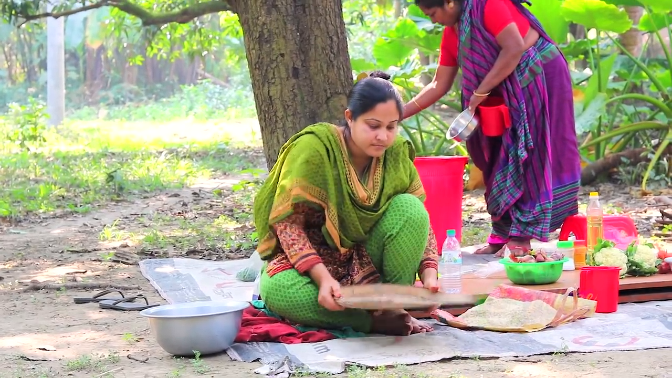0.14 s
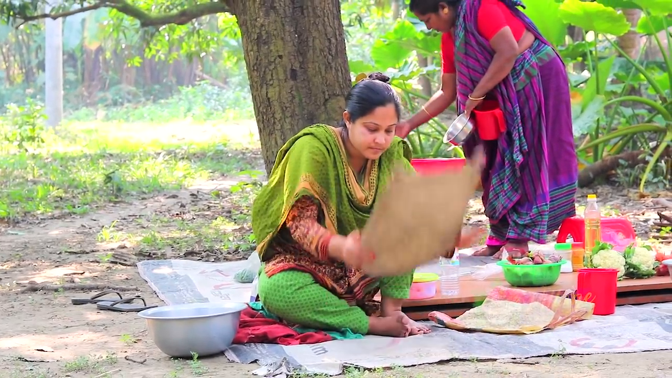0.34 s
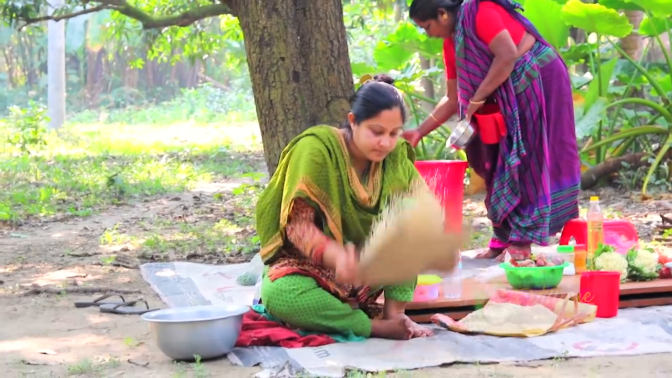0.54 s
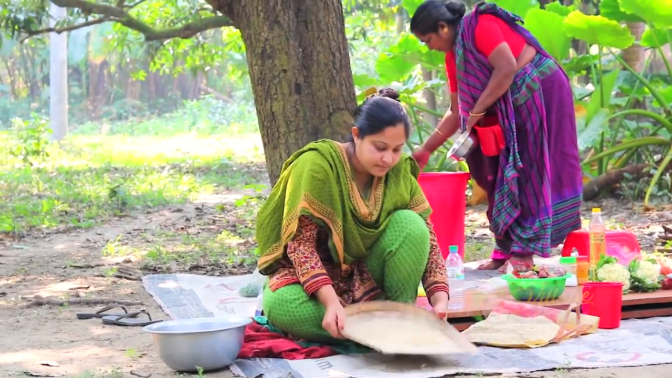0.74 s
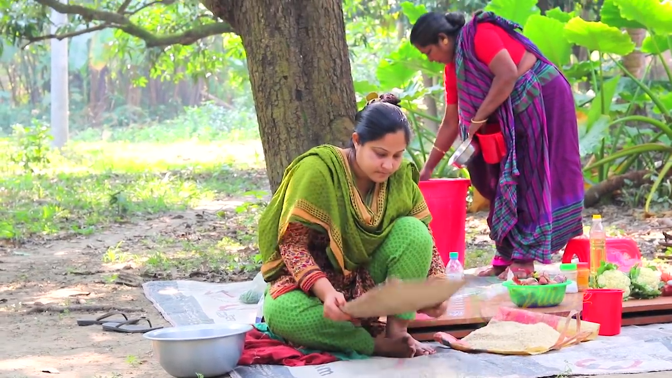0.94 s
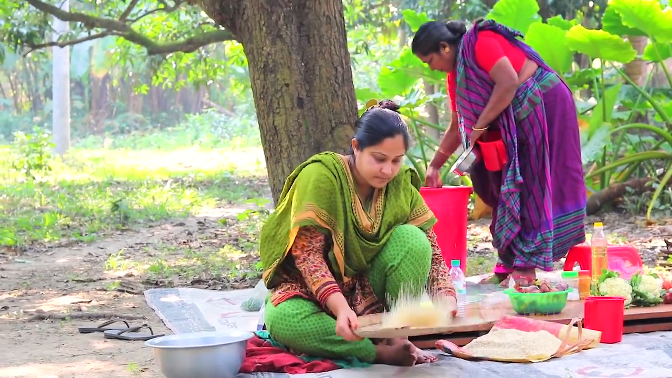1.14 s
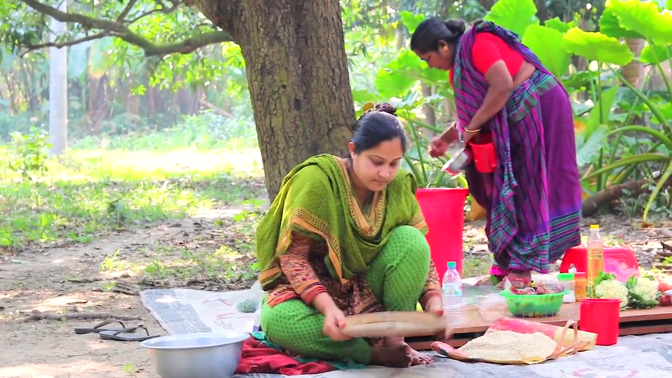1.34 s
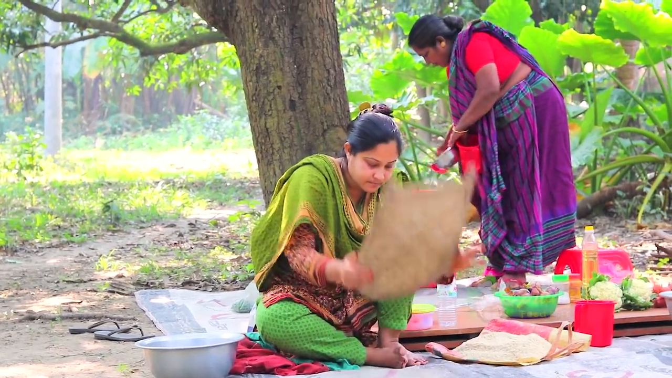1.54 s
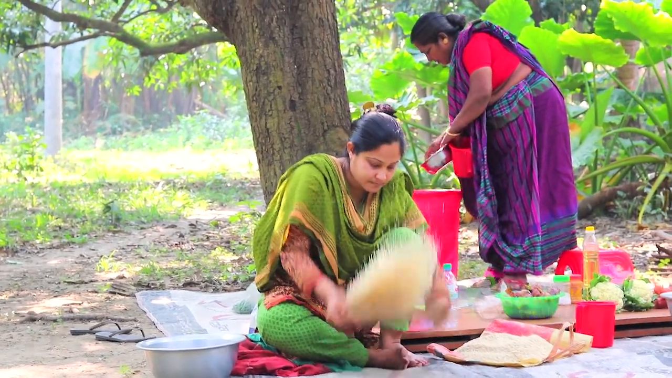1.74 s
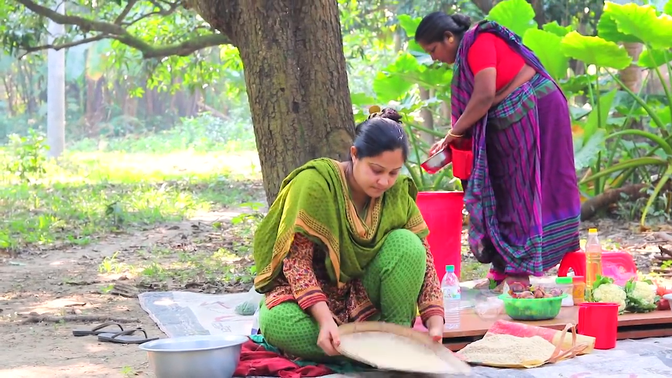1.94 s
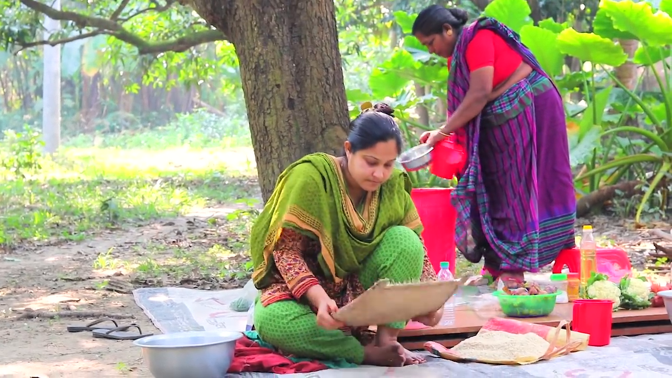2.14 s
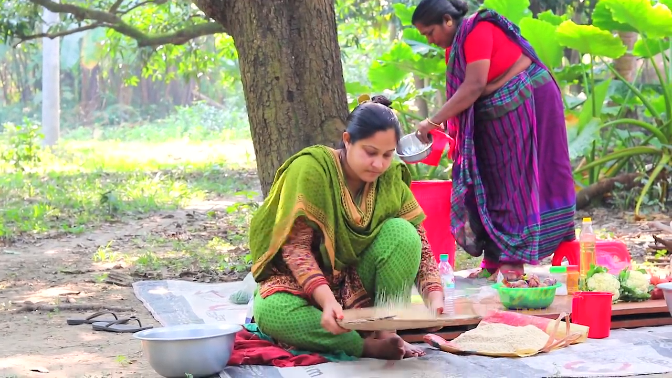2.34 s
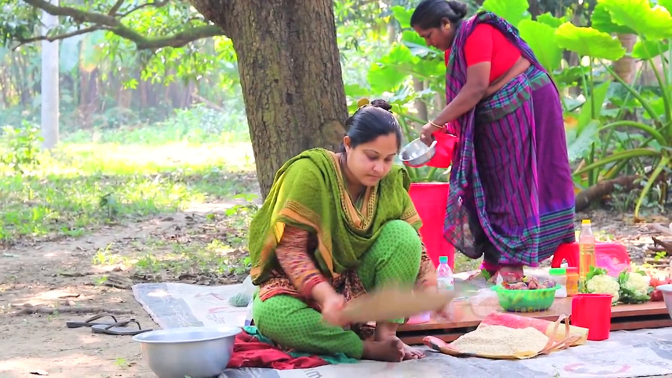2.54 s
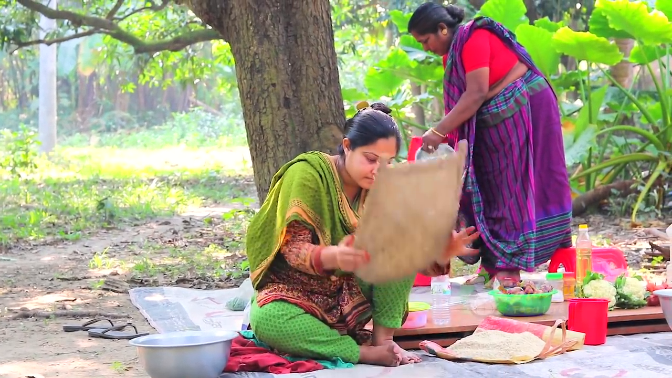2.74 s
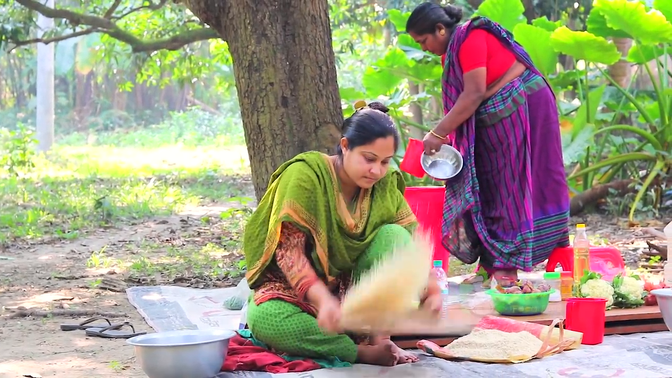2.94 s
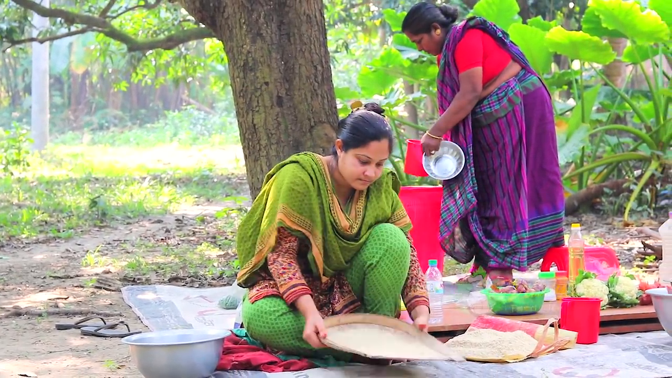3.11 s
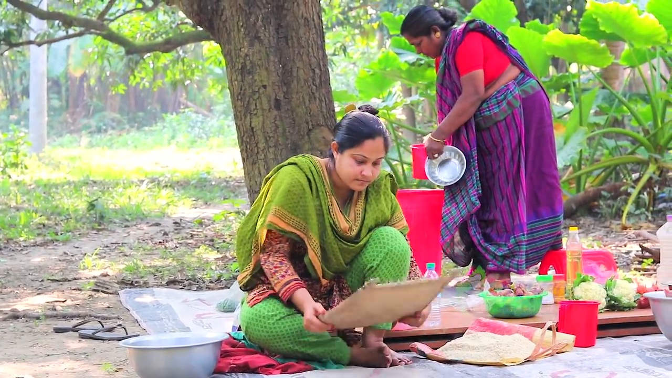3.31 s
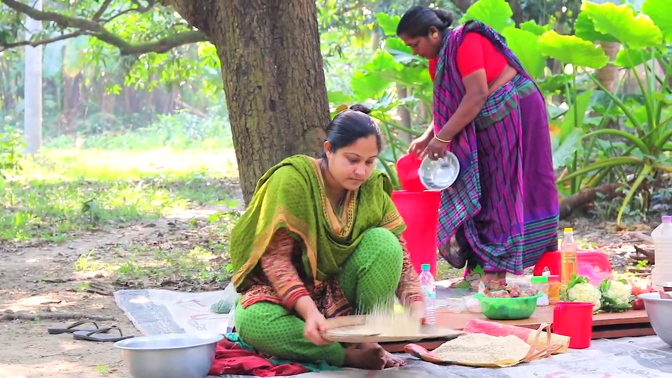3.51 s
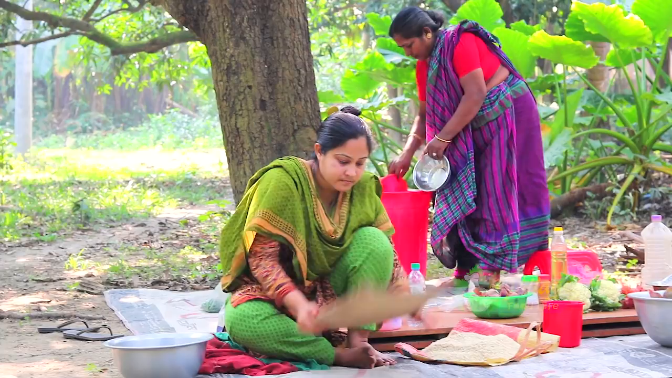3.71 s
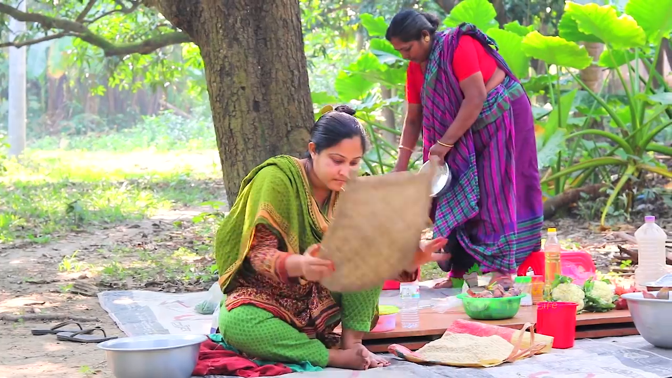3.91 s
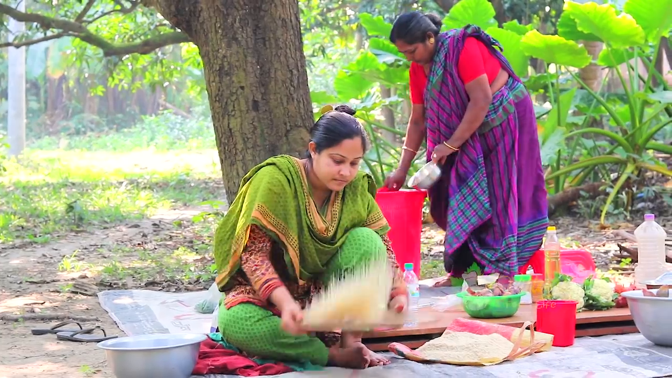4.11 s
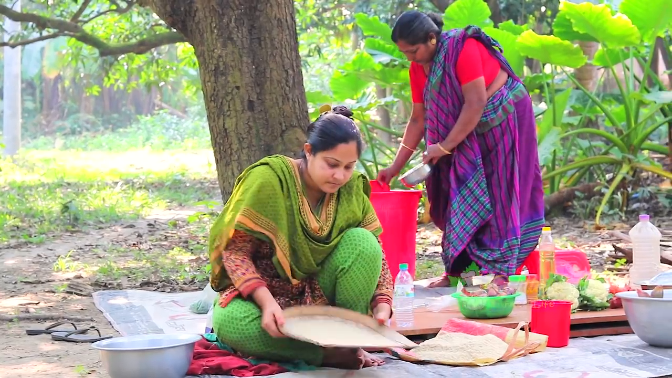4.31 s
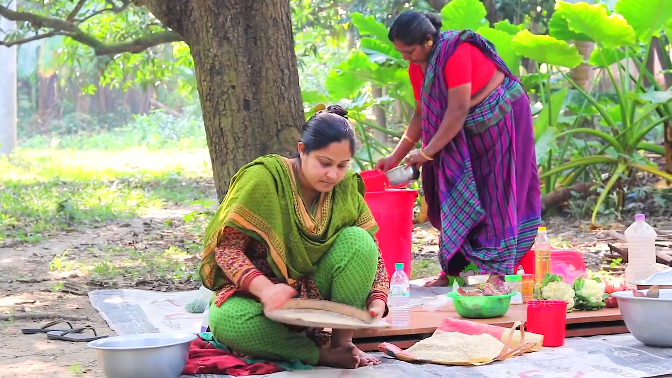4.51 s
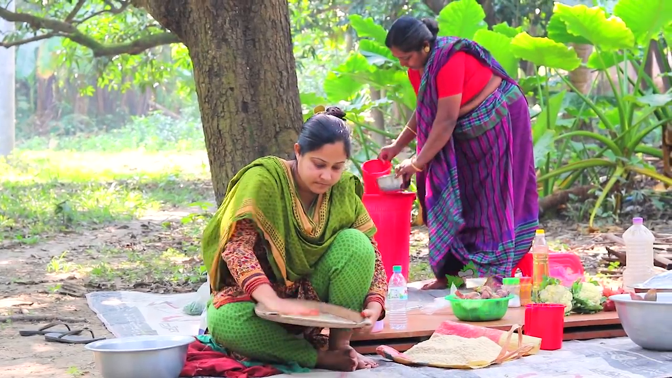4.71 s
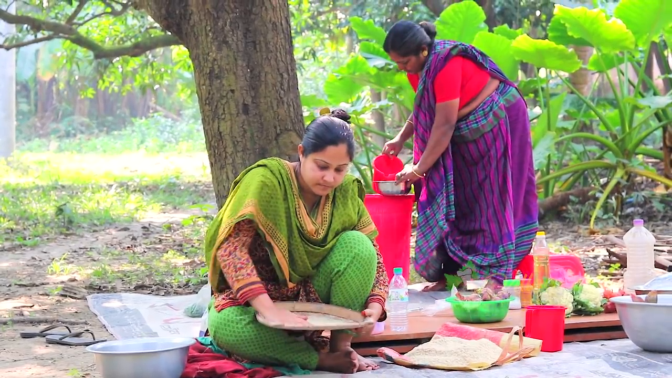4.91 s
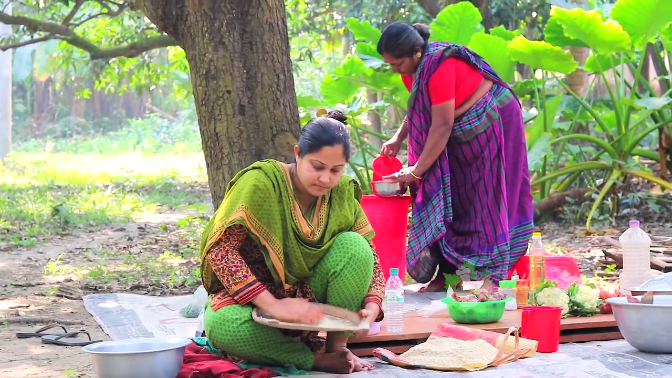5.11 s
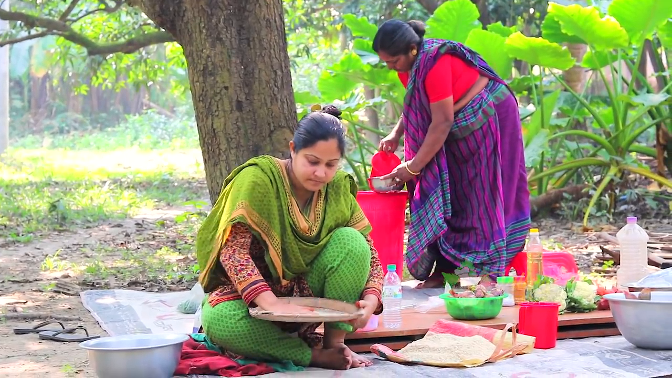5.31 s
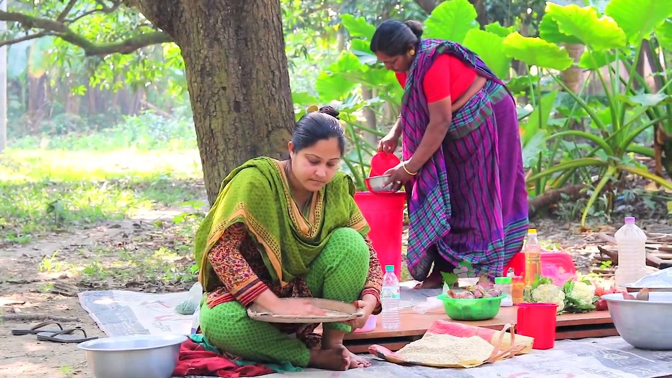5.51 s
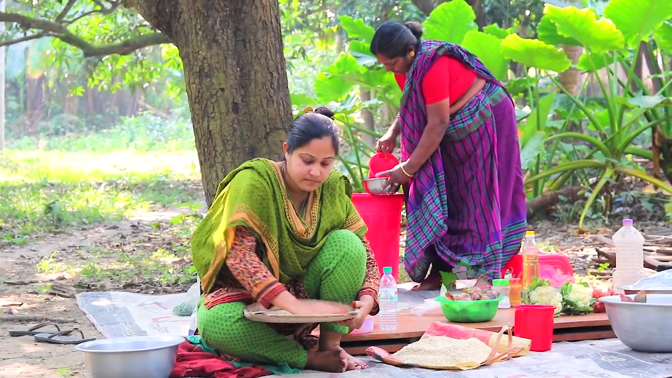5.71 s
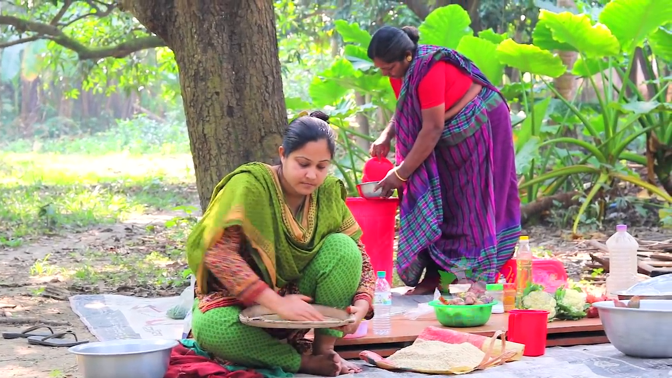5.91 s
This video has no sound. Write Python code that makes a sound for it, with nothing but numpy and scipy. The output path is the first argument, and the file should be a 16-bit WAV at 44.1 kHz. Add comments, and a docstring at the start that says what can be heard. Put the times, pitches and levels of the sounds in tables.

```python
"""Grain is winnowed on a flat woven tray: low flick, slide and high toss take turns, then a hand spreads the grain.
The grain is a dense noise of tiny impacts, coloured by the weave and swelling with each movement.
Fingers drum under the tray as ringing modes with cane rattle; cane ticks and stray grains are short bursts.
A metal bowl rings against a clattering bucket. Far off, an engine thuds in resonant pulses, small birds chirp
in fluttering tones and a thin whine comes and goes over the noise of the yard's air."""
import sys
import numpy as np
from scipy import signal
from scipy.fft import rfft, irfft
from scipy.io import wavfile

SR = 44100
rng = np.random.default_rng(int(sys.argv[2]) if len(sys.argv) > 2 else 0)


def master(y):
    """Save y as 16-bit WAV."""
    cut = np.clip(np.atleast_2d(y).T, -1, 1)
    pcm = np.round(cut * 32767)  # scale
    wavfile.write(sys.argv[1], SR, pcm.astype(np.int16))


N = 262395
TIME = np.arange(N) / SR
BINS = np.maximum(np.arange(N // 2 + 1) * SR / N, 1)   # Hz

# air of the yard, relative spectrum: [frequency_hz, density_db_per_hz]
YARD_COLOUR = [(20, -28), (35, -4), (55, 0.5), (80, 2), (130, -0.5), (230, -3.5), (440, -7), (700, -11),
               (1100, -12), (2100, -16.5), (3200, -16.5), (4000, -16.5), (6000, -21.5), (9000, -26.5),
               (16000, -35)]
# left-right likeness of the yard's air: [frequency_hz, likeness (1 = mono, 0 = unrelated)]
YARD_LIKENESS = [(60, 0.965), (200, 0.93), (550, 0.68), (1650, 0.12), (5000, 0.07), (15000, 0.11)]
# a faint far whine: [start_s, length_s, level_db]
WHINES = [(0.9, 0.33, -63), (2.65, 0.23, -63), (4.4, 0.225, -59.5), (5.1, 0.55, -58)]
# engine speed over time: [time_s, firings_per_s]
ENGINE_SPEED = [(0, 8.15), (2.0, 8.3), (2.2, 8.08), (3.7, 8.1), (4.4, 8.18), (4.5, 8.52), (5.95, 8.56)]
# drive of the engine thuds over time, ahead of modes and filters: [time_s, level_db]
ENGINE_LEVEL = [(0, -43), (1.1, -46), (1.7, -39), (3.4, -36.5), (4.5, -35), (5.95, -38)]
# resonances of the exhaust: [frequency_hz, relative_level_db, t60_s]
EXHAUST_MODES = [(80.6, -8, 0.42), (140, -10.5, .12), (210, 1, 0.042), (540, -12, 0.027)]
# direct thud and its echoes off the trees: [delay_s, gain_db]
ENGINE_ECHOES = [(0, 2), (.022, -7.5), (.053, -7.5)]
# short falling chirps of one bird: [start_s, level_db]
CHIRPS = [(4.515, -61), (4.555, -56), (4.675, -61), (5.61, -64), (5.7, -59), (5.75, -56)]
# level, buzzing trills of other birds: [start_s, length_s, pitch_hz, buzz_width_hz, level_db]
TRILLS = [(0.58, 0.058, 8000, 250, -58), (1.598, 0.012, 4350, 299, -51), (1.615, 0.012, 4400, 300, -50),
          (1.638, 0.17, 4170, 900, -54), (1.62, 0.21, 7870, 520, -52.5), (5.784, 0.027, 2510, 100, -52.5)]
# the bowl meets the bucket: [start_s, ring_db, clatter_db]
KNOCKS = [(4.7875, -34.5, -34), (4.848, -54, -42)]
# resonances of the bowl: [frequency_hz, relative_level_db, t60_s]
BOWL_MODES = [(400, -10, .12), (860, -11, 0.4), (950, -4, 1.0), (1060, -15, .2), (2580, -11, .3),
              (2874, -0.5, 0.22), (3105, -6, .28), (3650, -13, 0.4), (3926, -12, 0.45), (3860, -13, 0.4),
              (6100, -15, .3)]
# clatter of the bucket, relative spectrum: [frequency_hz, density_db_per_hz]
CLATTER_COLOUR = [(150, -14), (400, 6), (650, -1), (1000, 6.5), (1300, -8), (2200, -8.5), (2900, 1),
                  (4000, -3.5), (5000, -16), (8000, -9), (16000, -29)]
# creaks and clicks of the cane; the one at 0.585 s is a fourth finger tap: [start_s, level_db, centre_hz, t60_s]
TICKS = [(0.37, -42.5, 1220, .3), (0.489, -44, 7000, .012), (0.585, -37, 2000, .08),
         (0.649, -31, 7500, 0.0077), (0.995, -40, 3200, 0.022), (1.034, -41, 4100, .02),
         (1.827, -39, 8500, .012), (2.962, -43, 6000, 0.011), (4.456, -39.5, 1700, 0.068),
         (4.848, -39, 5600, 0.09), (5.808, -35, 7000, .012)]
# finger rolls: [start_s, roll_length_s, first_finger_db, second_finger_db, third_finger_db, cane_rattle_db]
ROLLS = [(0.558, 0.016, -15, -18.5, -24, -20.5), (1.722, 0.027, -18.5, -28, -21.5, -27),
         (2.8758, 0.0252, -19.5, -20.5, -28, -23.5), (4.0457, 0.0213, -19, -19, -30.5, -26.5)]
# resonances of the tray: [frequency_hz, relative_level_db, t60_s]
TRAY_MODES = [(164, -5, 0.14), (250, -5.5, 0.037), (344, -11, 0.054), (392, -11, 0.066), (430, -5.5, 0.017),
              (880, -16, 0.055)]
# loose canes rattling after a tap, relative spectrum: [frequency_hz, density_db_per_hz]
RATTLE_COLOUR = [(300, 2.5), (900, -5), (1800, -4), (2800, 2.5), (4600, -13), (6000, -10), (10000, -18.5),
                 (16000, -26)]
# high tosses coming down: [front_s, front_step_db, peak_s, peak_db, rise_db_per_s, fall_db_per_s]
TOSSES = [(0.673, 9, 0.75, -19.5, 125, 140), (1.864, 7.5, 1.921, -19.0, 215, 142),
          (3.019, 12.5, 3.0876, -18.5, 267, 138), (4.146, 8, 4.226, -18.8, 195, 162)]
# low flicks with a soft landing: [middle_s, hold_s, peak_db]
FLICKS = [(0.099, 0.028, -23.5), (1.25, 0.016, -24), (2.414, 0.0, -22.5), (3.579, 0.015, -23.5)]
# the heap slides as the tray swings up: [peak_s, peak_db]
SLIDES = [(0.256, -28.5), (1.418, -30.1), (2.591, -30), (3.749, -29)]
# strokes of the spreading hand: [middle_s, hold_s, peak_db]
SPREADS = [(5.033, 0.07, -35.5), (5.185, 0.017, -50.6), (5.534, 0.0006, -38.5), (5.663, 0.0, -49.5),
           (5.915, 0.0, -37.3)]
# colour of the patter, relative spectrum: [frequency_hz, density_db_per_hz]
GRAIN_COLOUR = [(150, -41), (300, -21.5), (450, -11.5), (750, -11.5), (1250, -12), (1600, -7), (2000, -7),
                (2400, -3), (5000, 0), (6000, 1.5), (8000, 1.5), (10000, -1.5), (13000, -7.5), (16000, -14)]
# peaks and hollows of the weave: [centre_hz, width_hz, gain_db]
WEAVE = [(1035, 190, 3.5), (1340, 240, -0.5), (2730, 250, 0.5), (3240, 410, 1), (5320, 400, -2),
         (5880, 360, 1), (6050, 160, 0), (9200, 2000, 0.5), (9960, 870, -5.5), (10700, 250, -3),
         (11300, 160, -4), (11560, 350, 0)]
# left-right likeness of the patter: [frequency_hz, likeness (clipped to 1)]
GRAIN_LIKENESS = [(400, 0.5), (1000, 1.15), (2200, 0.5), (3300, 0.7), (4900, 0.4), (6000, 0.77),
                  (7200, 0.3), (8900, 0.8), (10500, 0.5), (15000, .5)]
# stereo tilt of the patter: [frequency_hz, left_minus_right_db]
GRAIN_PAN = [(400, -1.5), (1600, -0.9), (2600, -5), (4600, 2.5), (5600, -2), (6700, 2), (7900, -5),
             (9400, 0.5), (10600, 0.5), (13000, 1.5), (15500, -2)]

WHINE_HZ, WHINE_WIDTH_HZ = 785, 36   # pitch, and how far it wavers
ENGINE_FIRES_AT_S = 3.354   # one firing falls here and sets the timing of all others
CHIRP_S, CHIRP_FROM_HZ, CHIRP_TO_HZ, CHIRP_WIDTH_HZ = 0.023, 4290, 3950, 200
# palm rub: pitch, flutter width, length beyond the stroke's hold, level relative to the stroke's peak
RUB_HZ, RUB_WIDTH_HZ, RUB_S, RUB_DB = 433.5, 230, 0.13, -15
SECOND_FINGER_S = 0.0116   # after the first finger
RATTLE_FOLLOWS = 0.29   # dB of cane rattle per dB of finger force
FRONT_S, FORERUN_DB_PER_S = 0.003, 129   # suddenness of a toss's front; slope of the few grains before it
BODY_GROWTH, SIZZLE_GROWTH = -0.037, 0.19   # extra dB of tray body and of husk sizzle per dB of patter
REST_DB = -60.5   # patter of the heap, never quite still
CUTOFF_HZ = 15900


def from_db(db):
    """Decibels to gain."""
    return 10 ** (np.asarray(db) / 20)


def rms_one(x):
    """Scale to unit power."""
    return x / np.sqrt(np.mean(x ** 2) + 1e-20)


def in_time(rows):
    """Each column of a time curve at every sample."""
    s, *columns = np.transpose(rows)
    return [np.interp(TIME, s, c) for c in columns]


def at_bins(points):
    """A curve over frequency, joined evenly on a log scale, at every bin."""
    hz, value = np.transpose(points)
    return np.interp(np.log(BINS), np.log(hz), value)


def drift(rate_hz):
    """Random wander of unit power, mostly slower than the given rate."""
    return rms_one(irfft(rfft(rng.standard_normal(N)) / (1 + (BINS / rate_hz) ** 2), N))


def soften(x, hz):
    """Gentle low-pass."""
    return signal.sosfilt(signal.butter(2, min(hz, .45 * SR), fs=SR, output="sos"), x)


def between(x, low_hz, high_hz):
    """Gentle band-pass."""
    return signal.sosfilt(signal.butter(2, [low_hz, min(high_hz, .45 * SR)], "band", fs=SR, output="sos"), x)


def stereo(pair, colour_db, likeness):
    """Blend two unrelated signals as mid and side into coloured left and right spectra."""
    mid, side = rfft(pair)
    alike = np.clip(at_bins(likeness), -1, 1)
    return from_db(colour_db) * (np.sqrt(1 + alike) * mid + np.sqrt(1 - alike) * side * [[1], [-1]])


def noise(colour, likeness):
    """Coloured stereo noise of unit power."""
    return rms_one(irfft(stereo(rng.standard_normal((2, N)), at_bins(colour), likeness), N))


def clicks(times, level_db):
    """One impulse at each time, over a vanishingly small floor."""
    at = np.clip(np.round(np.asarray(times) * SR).astype(int), 0, N - 1)
    return np.bincount(at, from_db(level_db), N) + 1e-18


def ring(force, hz, t60):
    """Resonator: a unit impulse starts a dying cosine of height 1."""
    r, w = from_db(-60 / (t60 * SR)), 2 * np.pi * hz / SR
    return signal.lfilter([1, -r * np.cos(w)], [1, -2 * r * np.cos(w), r * r], force)


def strike(times, level_db, modes, spread_db):
    """Each blow excites every mode with a random strength of its own."""
    chance = rng.standard_normal((len(times), len(modes)))
    out = 0
    for k, (hz, mode_db, t60) in enumerate(modes):
        force = clicks(times, level_db + mode_db + spread_db * chance[:, k])
        out = out + ring(force, hz, t60)
    return out


def dying(times, level_db, t60):
    """Envelope that jumps at each blow and dies away; overlapping blows add in power."""
    power = signal.lfilter([1], [1, -from_db(-120 / (t60 * SR))], clicks(times, 2 * level_db))
    return np.sqrt(np.abs(power))


def calls(rows, buzz=.8):
    """Gliding tones that swell and fade; a fast random flutter makes them buzzy or, when strong, hoarse."""
    out = np.zeros(N)
    for start, length, from_hz, to_hz, width, db in rows:
        at = np.flatnonzero((TIME >= start) & (TIME < start + length))
        u = np.linspace(0, 1, len(at))
        a, b = rms_one(soften(rng.standard_normal((2, SR)), width / 2))[:, -len(at):]
        phase = 2 * np.pi * np.cumsum(from_hz + (to_hz - from_hz) * u) / SR
        tone = (1 + buzz * a) * np.sin(phase) + buzz * b * np.cos(phase)
        out[at] += from_db(db) * rms_one(np.sqrt(4 * u * (1 - u)) * tone)
    return out


def yard_air():
    """Broad, bass-heavy noise whose level wanders slowly."""
    return from_db(-46.54) * noise(YARD_COLOUR, YARD_LIKENESS) * from_db(1.9 * drift(4.1))


def whine():
    """A thin, unsteady far tone: a sine roughened by slow flutter."""
    rows = [(s, length, WHINE_HZ, WHINE_HZ, WHINE_WIDTH_HZ, db) for s, length, db in WHINES]
    return calls(rows, buzz=0.78)


def engine(low_hz=120, distance_cut_hz=310):
    """Each firing excites the exhaust modes; echoes and a narrow band make a dull, far thud."""
    turns = np.cumsum(in_time(ENGINE_SPEED)[0]) / SR
    turns = turns - np.interp(ENGINE_FIRES_AT_S, TIME, turns)
    fired = np.flatnonzero(np.diff(np.floor(turns)))   # one firing per whole turn
    thuds = strike(TIME[fired], in_time(ENGINE_LEVEL)[0][fired], EXHAUST_MODES, spread_db=2.5)
    echoed = sum(from_db(db) * np.interp(TIME - lag, TIME, thuds, left=0) for lag, db in ENGINE_ECHOES)
    return between(echoed, low_hz, distance_cut_hz)


def birds():
    """Short falling chirps, and level trills with a stronger flutter."""
    chirps = [(s, CHIRP_S, CHIRP_FROM_HZ, CHIRP_TO_HZ, CHIRP_WIDTH_HZ, db) for s, db in CHIRPS]
    trills = [(s, length, hz, hz, width, db) for s, length, hz, width, db in TRILLS]
    return calls(chirps, buzz=0.9) + calls(trills, buzz=1.7)


def yard_echo(x, t60=0.22, cut_hz=3500):
    """Weak scattered reflections from ground, trunk and leaves: a dying, softened noise tail."""
    t = TIME[:SR // 2]
    scatter = soften(rng.standard_normal(len(t)) + .5 * rng.standard_normal((2, len(t))), cut_hz)
    scatter = scatter * from_db(-60 * t / t60) * (t > .008)
    return signal.fftconvolve(x, scatter / np.sqrt(np.sum(scatter ** 2) / 2), axes=1)[:, :N]


def bowl(clatter_t60=0.42, pan_db=-2.0):
    """Thin metal rings in its modes while the bucket clatters as dying noise."""
    s, ring_db, clatter_db = np.transpose(KNOCKS)
    metal = soften(strike(s, ring_db, BOWL_MODES, spread_db=1.5), 7000)
    clatter = noise(CLATTER_COLOUR, GRAIN_LIKENESS) * dying(s, clatter_db, clatter_t60)
    return metal * from_db([[pan_db], [-pan_db]]) + clatter


def ticks():
    """Cane creaks and clicks and one finger tap: dry dying bursts, each a noise band around its own pitch."""
    white = rng.standard_normal(N) + 0.57 * rng.standard_normal((2, N))
    return sum(rms_one(between(white, 0.77 * hz, 1.37 * hz)) * dying([s], np.array([db]), t60)
               for s, db, hz, t60 in TICKS)


def stray_grains(per_s=60, size_db=-39):
    """Single grains tick on the weave throughout, as band-passed impulses of random size."""
    size = from_db(size_db + 2 * np.minimum(rng.exponential(1, N), 3))
    hits = (rng.random(N) < per_s / SR) * size
    return between(hits, 2200, 9600) * from_db(2 * np.array([drift(200), drift(200)]))


def palm():
    """The palm rubs the tray under each spreading stroke: a dull tone made hoarse by strong flutter."""
    rubs = [(s - (hold_s + RUB_S) / 2, hold_s + RUB_S, RUB_HZ, RUB_HZ, RUB_WIDTH_HZ, db + RUB_DB)
            for s, hold_s, db in SPREADS]
    return calls(rubs, buzz=3.5)


def finger_taps(radiate_hz=245, pad_hz=720, crack_db=0.5, rattle_t60=0.01, tail_t60=0.073, tail_db=-15):
    """Three soft pads land in turn: each gives a hollow thump and shakes the loose canes."""
    taps = []
    for start, length, *fingers_db, cane_db in ROLLS:
        for finger_db, delay in zip(fingers_db, [0, SECOND_FINGER_S, length]):
            taps.append((start + delay, finger_db, cane_db + RATTLE_FOLLOWS * (finger_db - fingers_db[0])))
    s, thump_db, rattle_db = np.transpose(taps)
    # an open tray radiates little bass, a soft pad excites little treble
    thump = between(strike(s, thump_db, TRAY_MODES, spread_db=1.5), radiate_hz, pad_hz)
    shaking = dying(s, rattle_db + crack_db, rattle_t60) + dying(s, rattle_db + tail_db, tail_t60)
    return thump + noise(RATTLE_COLOUR, GRAIN_LIKENESS) * shaking


def swell(peak_s, peak_db, rise_db_per_s, fall_db_per_s, round_s, hold_s=0):
    """Level in dB of one movement: a steady rise, a rounded top, a steady fall."""
    away_s = np.maximum(np.abs(TIME - peak_s) - hold_s / 2, 0)
    slope = np.where(TIME < peak_s, rise_db_per_s, fall_db_per_s)
    return peak_db - slope * (np.hypot(away_s, round_s) - round_s)


def landing(front_s, step_db, peak_s, peak_db, rise_db_per_s, fall_db_per_s):
    """Level in dB of a toss coming down: forerunners, the sudden front, then the bulk."""
    early_s = front_s - TIME
    held_back_db = step_db * (1 + np.tanh(early_s / FRONT_S)) / 2 + FORERUN_DB_PER_S * np.maximum(early_s, 0)
    return swell(peak_s, peak_db, rise_db_per_s, fall_db_per_s, round_s=0.03) - held_back_db


def powers(swells, body_db, sizzle_db):
    """Power of tray body, patter and husk sizzle for one kind of movement; the sizzle grows fastest."""
    patter = np.sum(from_db(swells) ** 2, axis=0) + 1e-20
    share = patter / patter.max()
    body = share ** BODY_GROWTH * from_db(body_db) ** 2
    sizzle = share ** SIZZLE_GROWTH * from_db(sizzle_db) ** 2
    return patter * np.array([body, np.ones_like(share), sizzle])


def movements():
    """Toss, flick, slide, spread and rest add in power: dB of tray body, patter and sizzle."""
    tosses = [landing(*toss) for toss in TOSSES]
    flicks = [swell(s, db, rise_db_per_s=179.5, fall_db_per_s=255, round_s=0.057, hold_s=hold_s)
              for s, hold_s, db in FLICKS]
    slides = [swell(s, db, rise_db_per_s=310, fall_db_per_s=165, round_s=0.047) for s, db in SLIDES]
    spreads = [swell(s, db, rise_db_per_s=235, fall_db_per_s=320, round_s=0.058, hold_s=hold_s)
               for s, hold_s, db in SPREADS]
    # falling, tossed grain sounds brighter; sliding and hand-spread grain duller, with more tray body
    total = (powers(tosses, body_db=-9.5, sizzle_db=-2.5) + powers(flicks, body_db=-10.5, sizzle_db=-4.5)
             + powers(slides, body_db=-6.5, sizzle_db=-6.0) + powers(spreads, body_db=-5.0, sizzle_db=-6.0)
             + powers([[REST_DB]], body_db=-0.5, sizzle_db=-7.0))
    return 10 * np.log10(total)


def shifting(x, patch_db, patch_hz=350, patch_s=0.035):
    """As the heap moves over the weave, random patches of pitch swell and fade."""
    cells = signal.stft(x, SR, nperseg=512)[2]
    field = rng.standard_normal(cells.shape[1:])
    for axis, length in enumerate([patch_hz * 512 / SR, patch_s * SR / 256]):   # in cells
        field = signal.lfilter([1], [1, -np.exp(-2 / length)], field, axis=axis)
    return signal.istft(cells * rms_one(from_db(patch_db * rms_one(field))), SR)[1][:, :N]


def grain(hits_per_s=60000, flicker_db=0.46, body_trim_db=-0.52, patter_trim_db=-0.97, sizzle_trim_db=0.26,
          left_lag_s=1e-5):
    """Countless tiny impacts on the weave: the more grain moves, the denser and louder they are."""
    body_db, patter_db, sizzle_db = movements()
    # hits_per_s is scaled by the patter's level above -24.5 dB, up to one hit per sample
    density = np.clip(hits_per_s * from_db(.6 * (patter_db + 24.5)) / SR, .02, 1)
    hits = (rng.random((2, N)) < density) * rng.standard_normal((2, N)) / np.sqrt(density)
    weave_db = sum(db / (1 + (2 * (BINS - hz) / width) ** 2) for hz, width, db in WEAVE)
    spectra = stereo(hits, at_bins(GRAIN_COLOUR) + weave_db, GRAIN_LIKENESS)
    spectra = spectra * from_db(at_bins(GRAIN_PAN) * [[.5], [-.5]])
    # the tray lies a little to the right
    spectra = spectra * np.exp(-2j * np.pi * BINS * [[left_lag_s], [0]])
    # tray body below 3 kHz, patter between, husk sizzle above 9.5 kHz
    above_body = 1 / (1 + (3000 / BINS) ** 6)
    above_patter = 1 / (1 + (9500 / BINS) ** 14)
    parts = [(1 - above_body, body_db + body_trim_db),
             (above_body - above_patter, patter_db + patter_trim_db),
             (above_patter, sizzle_db + sizzle_trim_db)]
    sound = sum(rms_one(irfft(spectra * share, N)) * from_db(db) for share, db in parts)
    return shifting(sound, patch_db=1.8) * from_db(flicker_db * drift(46))


def scene():
    """The grain, over handling sounds with their echo, the yard's air and the far sources."""
    far = engine() + birds() + whine()
    handling = bowl() + ticks() + stray_grains() + palm() + finger_taps()
    around = handling + from_db(-21) * yard_echo(handling) + yard_air() + far
    return grain() + around * from_db([[-.25], [.25]])   # left, right


def record(dry, low_cut_hz=45):
    """The microphone drops the deepest bass; the top is cut steeply."""
    low_loss = 1 + (low_cut_hz / BINS) ** 4
    top_loss = 1 + (BINS / CUTOFF_HZ) ** 400
    return irfft(rfft(dry) / np.sqrt(low_loss * top_loss), N)


dry = scene()
out = record(dry)
master(out)
```